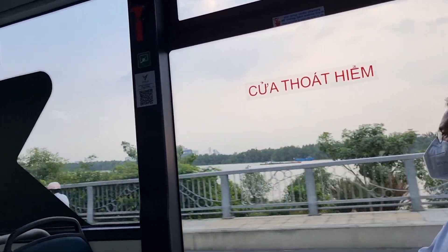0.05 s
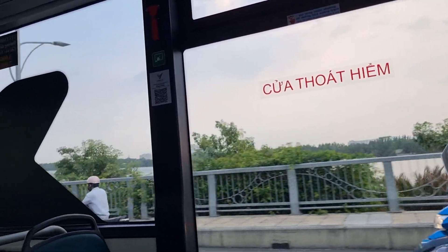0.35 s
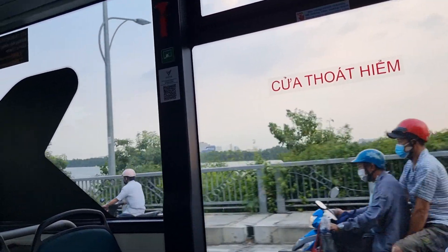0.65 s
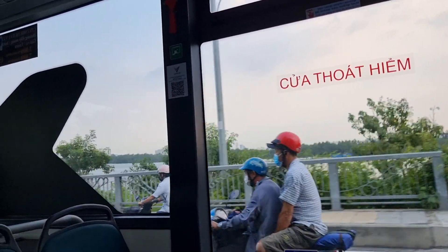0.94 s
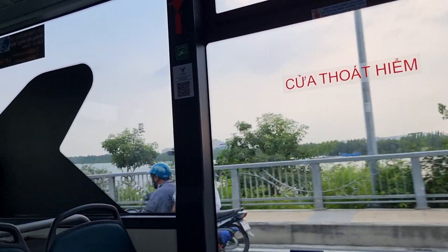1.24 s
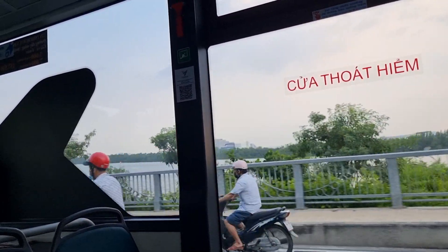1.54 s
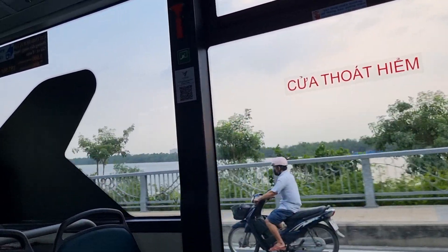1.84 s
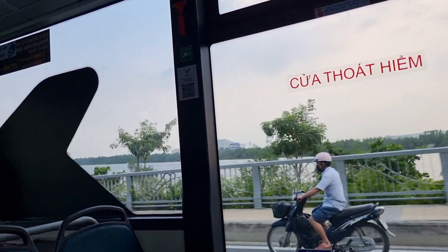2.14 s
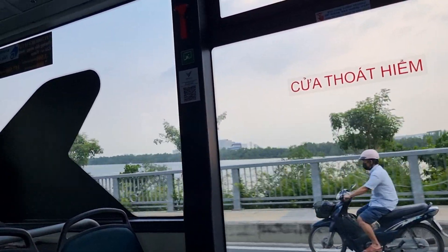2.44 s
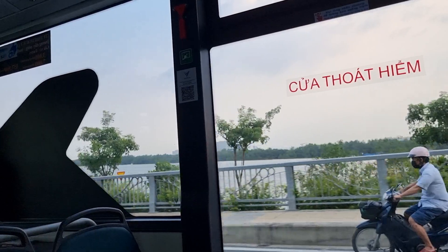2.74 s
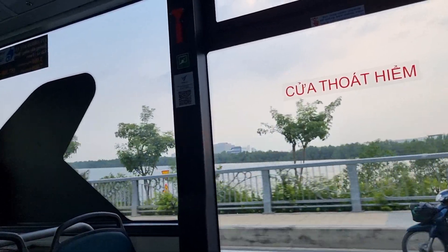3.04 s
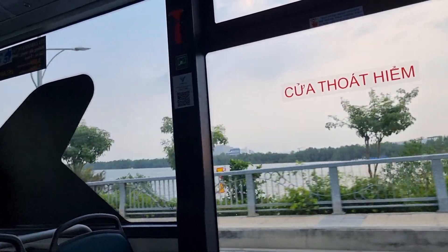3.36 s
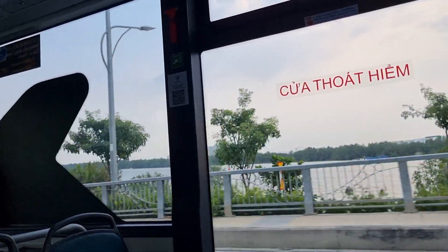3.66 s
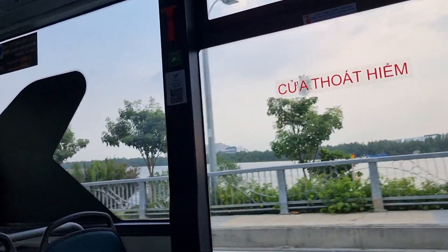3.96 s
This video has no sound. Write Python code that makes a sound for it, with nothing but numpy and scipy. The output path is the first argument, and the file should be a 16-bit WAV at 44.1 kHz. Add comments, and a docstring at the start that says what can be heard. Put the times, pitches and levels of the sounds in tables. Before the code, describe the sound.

A moving bus rumbles inside, thudding and rattling as it crosses a bump.

```python
"""A city bus crosses a bump

Inside the bus, the tyres roar, the engine drones and the road makes the cabin boom.
The front and rear axles cross a bump: the body heaves, the floor thuds, loose panels and trim
rattle, and a dry metal fitting squeaks three times. Later the tyre tread starts to sing."""
import sys
import numpy as np
from scipy import signal
from scipy.fft import rfft, irfft
from scipy.io import wavfile

SR = 44100
rng = np.random.default_rng(int(sys.argv[2]) if len(sys.argv) > 2 else 0)


def transcribe(u):
    """Save the signal u as a 16-bit wav file named by the first command-line argument.

    u: samples, shape (n,) or (channels, n), limited to [-1, 1]; the rate is SR.
    q: integer samples, one column per channel.
    """
    v = np.clip(np.atleast_2d(u).T, -1, 1)
    q = np.round(v * 32767).astype(np.int16)
    wavfile.write(sys.argv[1], SR, q)


N = 176400
TIME_S = np.arange(N) / SR
FREQ_HZ = np.maximum(np.arange(N // 2 + 1) * SR / N, 1)

# How alike the two sides sound (1 = same, -1 = opposite): frequency_hz, likeness
STEREO_LIKENESS = [(60,0.88),(190,0.84),(280,0.52),(400,0.19),(700,-0.085),(1300,-0.64),(2400,-0.15),(4400,-0.12),(12000,-0.064)]
# How much louder the left side is than the right: frequency_hz, difference_db
STEREO_BALANCE = [(30,-6),(80,0.5),(160,-2.5),(280,-1.5),(550,-2),(1100,-1.5),(2200,-5),(4500,1),(8000,-4),(13000,-1.5)]
# Tone of the tyre and air noise: frequency_hz, relative_db
ROAD_SPECTRUM = [(20,-3.5),(33,-1.5),(60,-0.5),(90,-3.5),(120,-8.5),(185,-10.5),(260,-9.5),(330,-11),(385,-9),(450,-10.5),(530,-11),(620,-14),(800,-11.5),(1100,-15.5),(1350,-16.5),(1650,-23),(2100,-26),(3200,-32),(4700,-44.5),(7000,-43),(10000,-55.5),(12500,-58),(15500,-59)]
# Ringing of the cabin's air and panels: pitch_hz, width_hz, level_db
CABIN_MODES = [(36.06,6.9,-34.5),(80.5,17,-37),(215,21,-41.5),(262.2,37,-43),(378,35,-43.5),(812,39,-52.5),(1287,32,-52),(1879,7.9,-63)]
# The bass rumble eases on smoother road: time_s, gain_db
RUMBLE_GAIN = [(0,0),(1.2,2.5),(2,-1),(2.8,-0.5),(3.15,-2.5),(4,-1)]
# A bright hiss that fades after the bump: time_s, level_db
HISS_LEVEL = [(0,-52),(.2,-52.5),(1.2,-52),(1.85,-53.5),(2.3,-58),(2.9,-72),(4,-74)]
# Tones of the engine: multiple_of_firing_rate, level_db
ENGINE_TONES = [(1,-35),(2,-38)]
# The engine pulls over the bump, then eases off: time_s, gain_db
ENGINE_GAIN = [(0,-0.5),(.5,-3),(.85,3),(1.3,2.5),(2.1,-3),(2.55,-3.5),(4,-4)]
# Tones of the tyre tread: pitch_hz, level_db
TREAD_TONES = [(409,-38.5),(430,-42.5),(457,-38),(481,-42.5)]
# How the tread tones swell: time_s, gain_db
TREAD_GAIN = [(0,-30),(2.55,-22),(2.68,-7),(2.78,-1.5),(3.2,0),(3.65,0),(4,1)]
# Squeaks of the metal fitting: start_s, length_s, pitch_hz, jitter_hz, level_db
FITTING_SQUEAKS = [(0.841,0.011,13420,110,-37.5),(0.977,0.038,13780,240,-42.5),(1.537,.020,14030,480,-46)]
# Bursts of rattling trim: peak_s, level_db, rise_s, fall_s
TRIM_RATTLES = [(0,-41.5,0.018,0.034),(.44,-52,0.092,0.25),(0.949,-43,0.074,0.099),(1.02,-42.5,0.019,0.038),(1.135,-48,0.013,.07),(1.41,-46.5,0.015,0.18),(1.472,-40,.002,.007),(1.518,-37,0.016,0.068),(1.59,-49,.025,.07),(1.84,-51,0.085,0.062),(2.16,-47,0.0057,0.075),(2.665,-49,0.019,0.055),(3.48,-56,.02,.05),(3.98,-51,0.018,.05)]
# Tone of the rattles and the hiss: frequency_hz, relative_db
BRIGHT_SPECTRUM = [(1000,-32),(2400,6.5),(3400,8),(4600,1.5),(7000,4.5),(10000,-7),(12300,-6.5),(15500,-9)]
# The floor thuds as the axles land: peak_s, level_db, rise_s, fall_s
FLOOR_THUDS = [(.83,-25.5,0.022,0.13),(1.06,-32.5,0.022,0.034),(1.39,-27,0.033,.1)]
# Tone of a thud: frequency_hz, relative_db
THUD_SPECTRUM = [(80,-28),(130,-5),(170,-2.5),(260,1),(350,-6.5),(480,-22),(1200,-55)]
# Loose panels hit their frames: peak_s, level_db
PANEL_CLACKS = [(.93,-38),(.966,-38),(1.025,-39),(1.516,-32),(1.565,-35),(1.598,-33),(1.645,-35)]
# Tone of a clack: frequency_hz, relative_db
CLACK_SPECTRUM = [(400,-18),(900,3),(1900,8.5),(2800,-2.5),(4000,-8.5),(7000,-17),(12000,-37)]
# Jolts as the axles cross the bump: peak_s, heave_db, panel_roar_db, rise_s, fall_s
AXLE_JOLTS = [(.80,-18.5,-31,0.034,0.085),(.905,-10.5,-35.5,0.033,0.082),(.95,-15.5,-25,0.031,0.083),(1.02,-16.5,-33,.012,0.057),(1.16,-24,-32.5,0.022,.08),(1.355,-14.5,-31,0.03,0.19),(1.44,-13,-24.5,0.027,0.15),(1.515,-18,-24,0.015,0.12),(1.69,-17.5,-45,0.019,0.036)]
# Ways the body shakes on its springs: pitch_hz, width_hz, relative_db
BODY_MODES = [(25.6,9.7,-4.5),(39,7.2,2),(82.1,19,-1.5),(165,25,-13)]
# Tone of the shaken panels: frequency_hz, relative_db
PANEL_SPECTRUM = [(60,-20),(130,-13),(250,5),(330,-0.5),(420,9),(560,2),(850,1.5),(1400,0),(2400,-9.5),(3300,-15.5),(4500,-31),(9000,-40)]


def from_db(db):
    """Turn decibels into a gain."""
    return 10 ** (np.asarray(db) / 20)


def unit_power(x):
    """Scale a signal to an average power of 1."""
    return x / np.sqrt(np.mean(x ** 2) + 1e-20)


def over_frequency(table):
    """Join a table's points into a curve along log frequency."""
    hz, value = np.transpose(table)
    return np.interp(np.log(FREQ_HZ), np.log(hz), value)


def gain_over_time(table):
    """Join (time_s, level_db) points into a gain for every sample."""
    return from_db(np.interp(TIME_S, *np.transpose(table)))


def phase_of(hz):
    """The running angle of a tone whose pitch may change."""
    return 2 * np.pi * np.cumsum(np.broadcast_to(hz, N)) / SR


def drift(rate_hz):
    """A random wobble of size about 1, mostly slower than rate_hz."""
    return unit_power(irfft(rfft(rng.standard_normal(N)) / (1 + (FREQ_HZ / rate_hz) ** 2), N))


def resonance(hz, width_hz, steady):
    """Ringing driven by random shaking; steady (0 to 1) evens out its loudness."""
    swing = drift(width_hz * .75) + 1j * drift(width_hz * .75)
    swing /= (np.abs(swing) ** 2 + .2) ** (steady / 2)
    return unit_power(np.real(swing * np.exp(1j * phase_of(hz))))


def swell(peak_s, rise_s, fall_s):
    """A rounded rise to a peak, then a steady dying away."""
    before = np.minimum(TIME_S - peak_s, 0) / rise_s
    after = np.maximum(TIME_S - peak_s, 0) / fall_s
    return np.exp(-np.minimum(before ** 2 / 2 + after, 20))


def joined_swells(events):
    """One loudness curve from several swells, whose powers add."""
    return np.sqrt(sum((from_db(db) * swell(s, rise, fall)) ** 2 for s, db, rise, fall in events))


def cabin_noise(spectrum):
    """Stereo noise of a given tone, alike on both sides in the bass and spread out above."""
    mid, side = rfft(rng.standard_normal((2, N)))
    likeness = over_frequency(STEREO_LIKENESS)
    both = np.sqrt(1 + likeness) * mid + np.sqrt(1 - likeness) * side * [[1], [-1]]
    return unit_power(irfft(both * from_db(over_frequency(spectrum)), N))


def cabin_echo(x, decay_s=.27):
    """Dense echoes from glass and panels, different on each side, 60 dB down after decay_s."""
    tail = rng.standard_normal((2, SR // 2)) * from_db(-60 * TIME_S[:SR // 2] / decay_s)
    tail /= np.sqrt(np.sum(tail ** 2) / 2)
    return signal.fftconvolve(x[None], tail, axes=1)[:, :N]


def road(roar_db=-26.5, bass_edge_hz=91):
    """Tyres roar on the road and set the cabin booming, with a faint hiss on top."""
    boom = sum(from_db(db) * resonance(hz, width, steady=.51) for hz, width, db in CABIN_MODES)
    hiss = gain_over_time(HISS_LEVEL) * cabin_noise(BRIGHT_SPECTRUM)
    roar = from_db(roar_db) * cabin_noise(ROAD_SPECTRUM) + boom
    bass = irfft(rfft(roar) / (1 + (FREQ_HZ / bass_edge_hz) ** 6), N)
    upper = roar - bass
    return upper + gain_over_time(RUMBLE_GAIN) * bass + hiss


def engine(firing_hz=80.3, wander=.014, roughness=.6):
    """The firing cylinders make a rough drone, louder when the engine pulls."""
    phase = phase_of(firing_hz * (1 + wander * drift(4.8)))
    drone = 0
    for multiple, db in ENGINE_TONES:
        tone = np.sin(multiple * phase) * (1 + roughness * drift(11))
        drone += from_db(db) * unit_power(tone)
    return gain_over_time(ENGINE_GAIN) * drone


def tyre_song(climb_per_s=.025, wander=.004, flutter=.3):
    """Tread tones set in with a brief howl and creep up in pitch; each side has its own flutter."""
    howl_level = from_db(-32) * swell(peak_s=2.89, rise_s=.09, fall_s=.13)
    sides = []
    for _ in range(2):
        # The tones pass their listed pitches at about 3.3 s.
        speed = 1 + climb_per_s * (TIME_S - 3.3) + wander * drift(10)
        tones = 0
        for hz, db in TREAD_TONES:
            tone = np.sin(phase_of(hz * speed)) * (1 + flutter * drift(10))
            tones += from_db(db) * unit_power(tone)
        howl = howl_level * resonance(hz=418.6, width_hz=26, steady=1)
        sides.append(gain_over_time(TREAD_GAIN) * tones + howl)
    return np.array(sides)


def squeaks(edge_s=.0022, flutter_hz=550, echo_db=1.5):
    """Dry metal sticks and slips in brief whistles; the first also sets off a lower ping."""
    whistles = 0
    for start_s, length_s, hz, jitter_hz, db in FITTING_SQUEAKS:
        inside_s = np.minimum(TIME_S - start_s, start_s + length_s - TIME_S)
        gate = np.clip(inside_s / edge_s, 0, 1)
        tone = np.sqrt(2) * np.sin(phase_of(hz + jitter_hz * drift(flutter_hz)))
        whistles += from_db(db) * gate * tone
    first_s = FITTING_SQUEAKS[0][0]
    ping_level = from_db(-48.5) * swell(first_s + .024, rise_s=.012, fall_s=.025)
    ping = ping_level * resonance(hz=5708, width_hz=25, steady=.77)
    return whistles + ping + from_db(echo_db) * cabin_echo(whistles)


def rattles(taps_per_s=2500, spread_db=2):
    """Loose trim makes flurries of tiny taps, blurred by the cabin's echoes."""
    sizes = from_db(spread_db * np.minimum(rng.exponential(1, (2, N)), 4))
    signs = rng.choice([-1, 1], (2, N))
    taps = sizes * signs * (rng.random((2, N)) < taps_per_s / SR)
    blurred = taps + cabin_echo(taps.mean(axis=0))
    bright = irfft(rfft(blurred) * from_db(over_frequency(BRIGHT_SPECTRUM)), N)
    return joined_swells(TRIM_RATTLES) * unit_power(bright)


def knocks():
    """The floor thuds as the axles land, and loose panels clack against their frames."""
    thud = sum(from_db(db) * swell(s, rise, fall) for s, db, rise, fall in FLOOR_THUDS)
    clack = sum(from_db(db) * swell(s, rise_s=.004, fall_s=.028) for s, db in PANEL_CLACKS)
    return thud * cabin_noise(THUD_SPECTRUM) + clack * cabin_noise(CLACK_SPECTRUM)


def bump():
    """Each jolt heaves the body on its springs and shakes a roar out of the panels."""
    heave = joined_swells((s, db, rise, fall) for s, db, _, rise, fall in AXLE_JOLTS)
    roar = joined_swells((s, db, rise, fall) for s, _, db, rise, fall in AXLE_JOLTS)
    body = sum(from_db(db) * resonance(hz, width, steady=.9) for hz, width, db in BODY_MODES)
    return heave * unit_power(body) + roar * cabin_noise(PANEL_SPECTRUM)


def scene():
    """Everything as heard from a seat by the window."""
    mix = road() + engine() + bump() + knocks() + rattles() + squeaks() + tyre_song()
    side_gains = from_db(over_frequency(STEREO_BALANCE) * [[.5], [-.5]])
    return irfft(rfft(mix) * side_gains, N)


def record(dry, low_cut_hz=17, high_cut_hz=15750):
    """The microphone loses the deepest bass, and the highest treble is cut off."""
    x = signal.sosfilt(signal.butter(2, low_cut_hz, "high", fs=SR, output="sos"), dry)
    return irfft(rfft(x) / np.sqrt(1 + (FREQ_HZ / high_cut_hz) ** 240), N)


dry = scene()
out = record(dry)
transcribe(out)
```